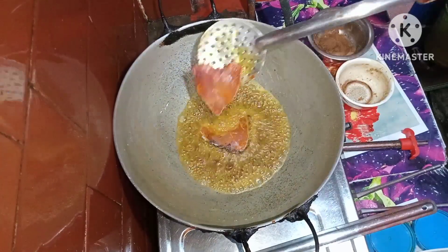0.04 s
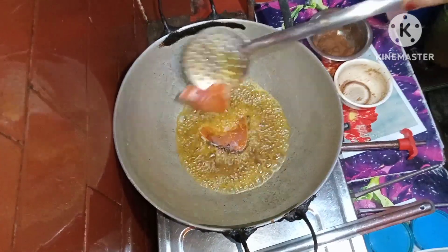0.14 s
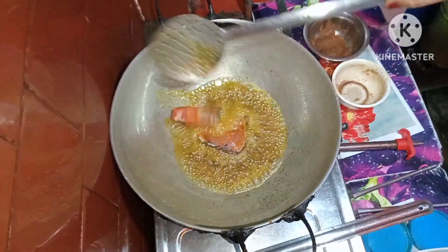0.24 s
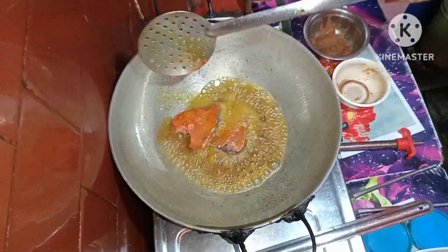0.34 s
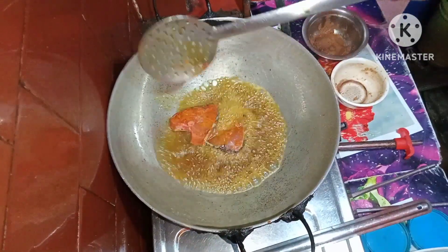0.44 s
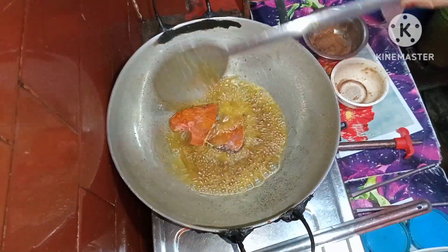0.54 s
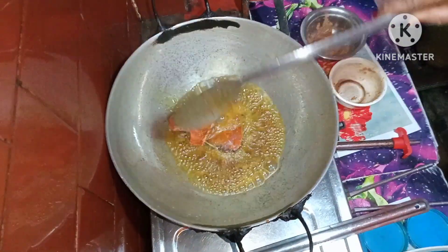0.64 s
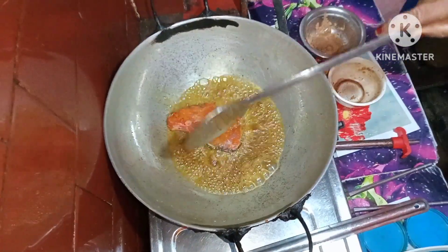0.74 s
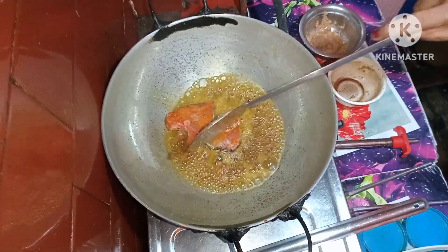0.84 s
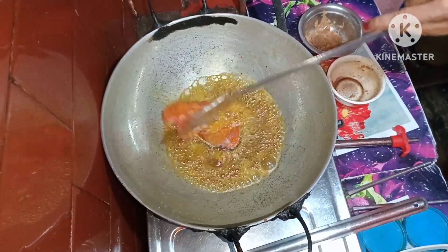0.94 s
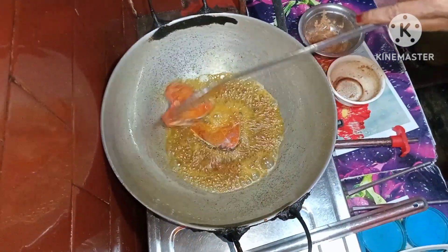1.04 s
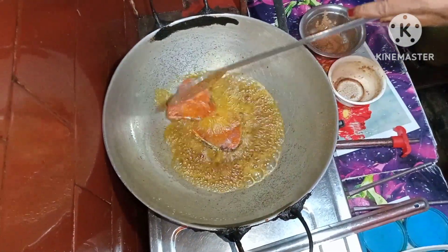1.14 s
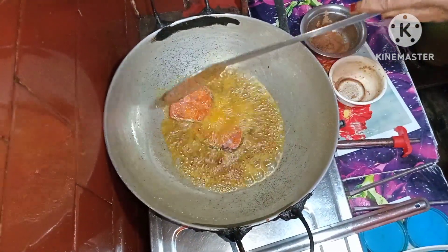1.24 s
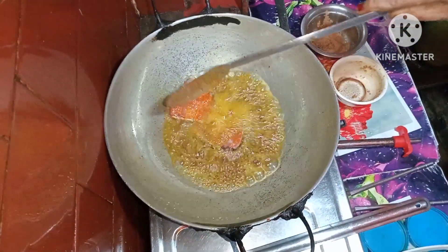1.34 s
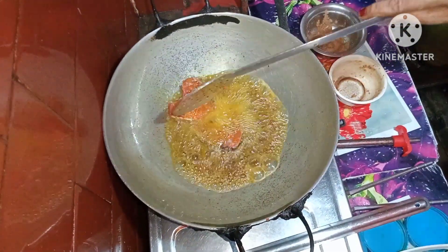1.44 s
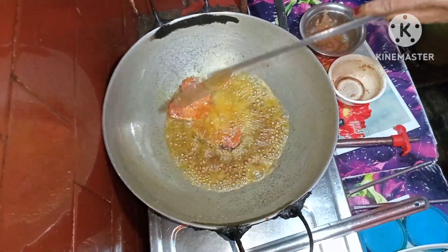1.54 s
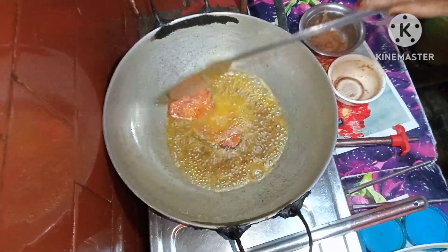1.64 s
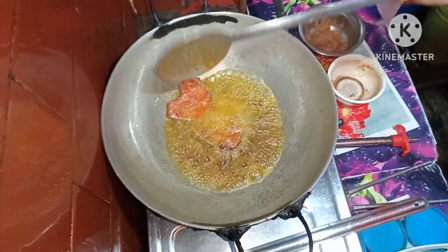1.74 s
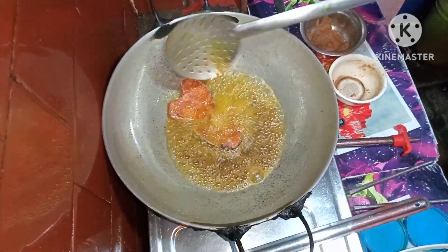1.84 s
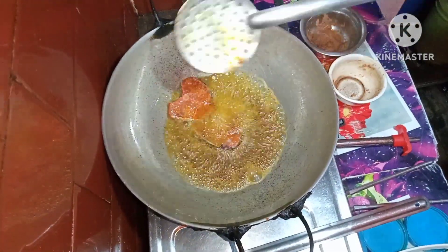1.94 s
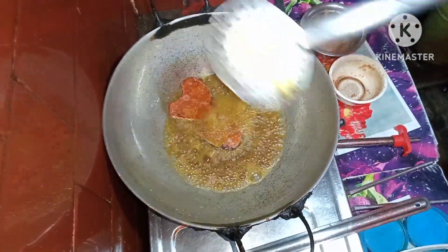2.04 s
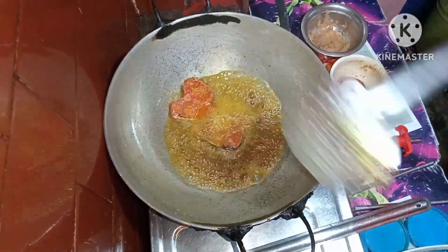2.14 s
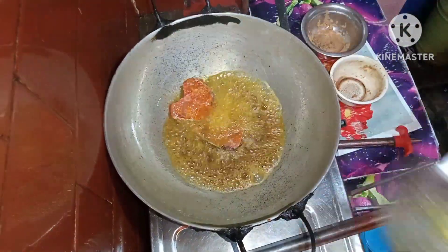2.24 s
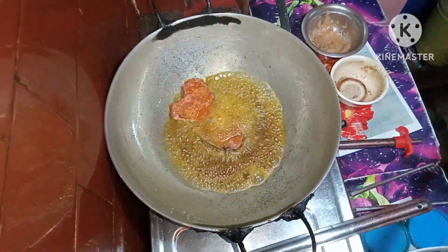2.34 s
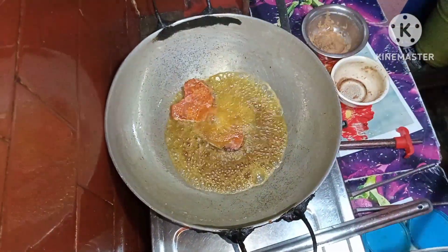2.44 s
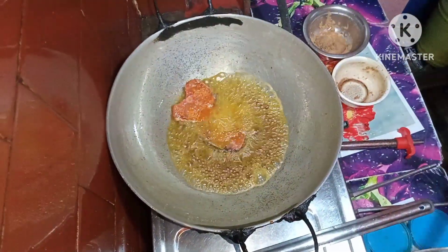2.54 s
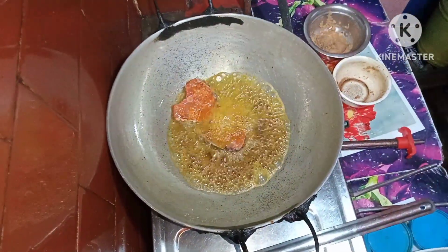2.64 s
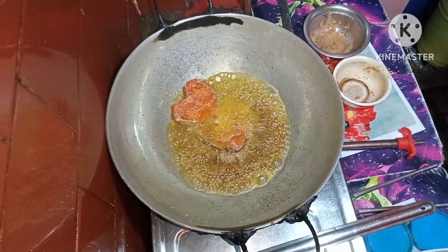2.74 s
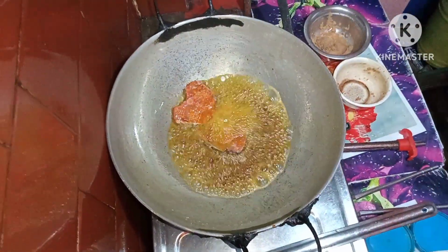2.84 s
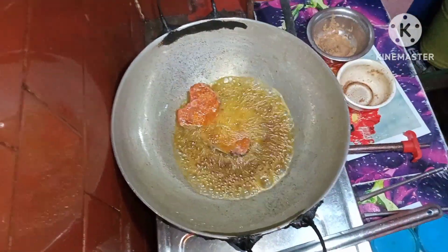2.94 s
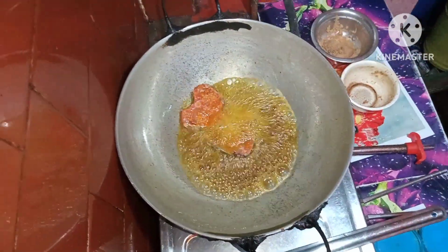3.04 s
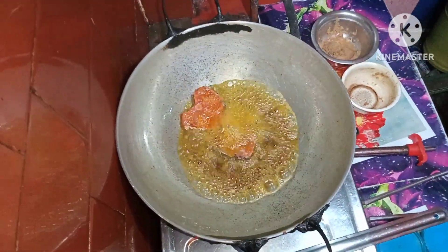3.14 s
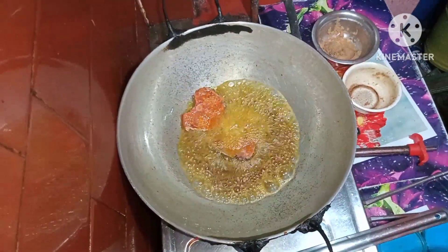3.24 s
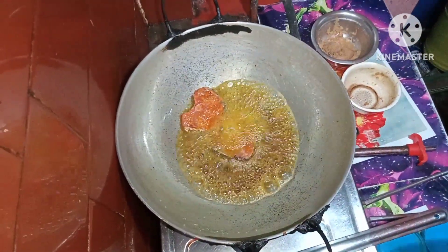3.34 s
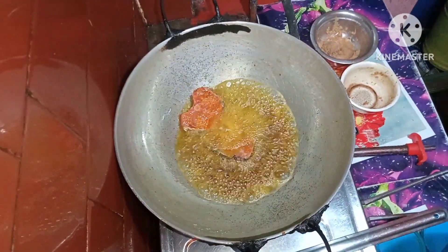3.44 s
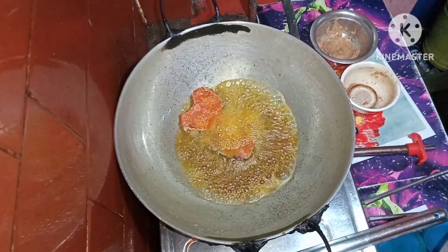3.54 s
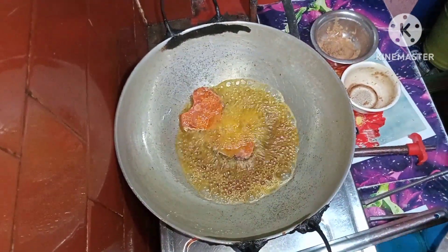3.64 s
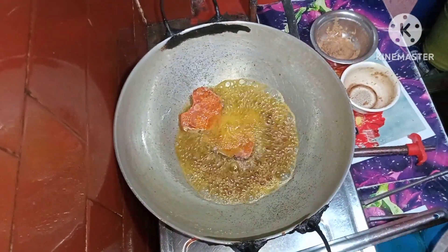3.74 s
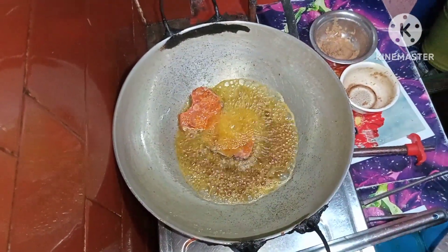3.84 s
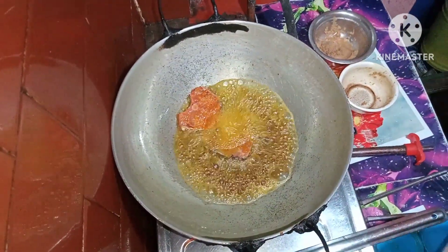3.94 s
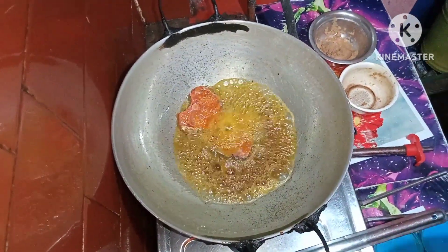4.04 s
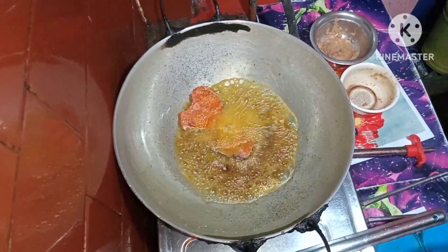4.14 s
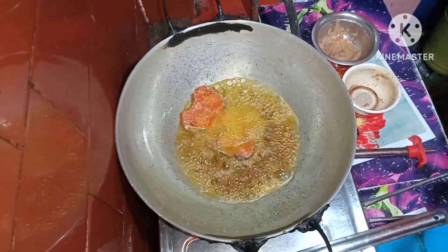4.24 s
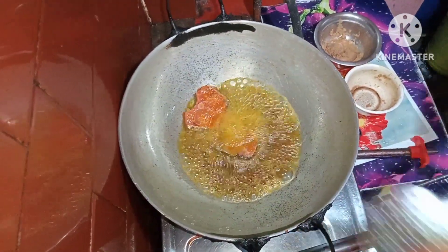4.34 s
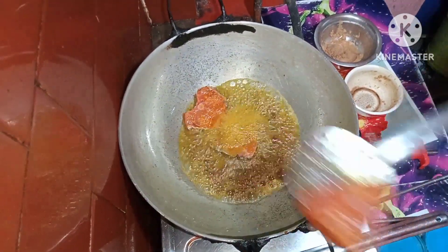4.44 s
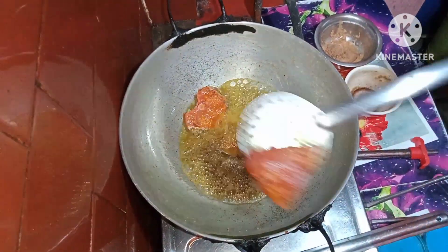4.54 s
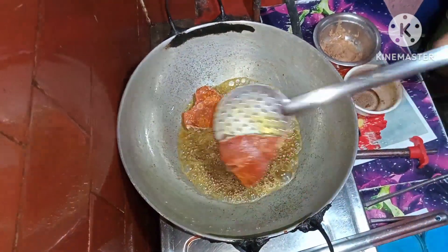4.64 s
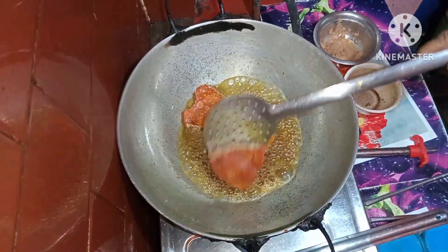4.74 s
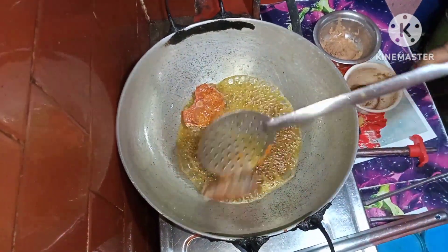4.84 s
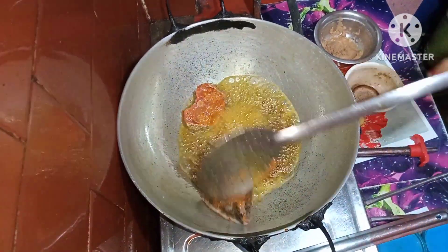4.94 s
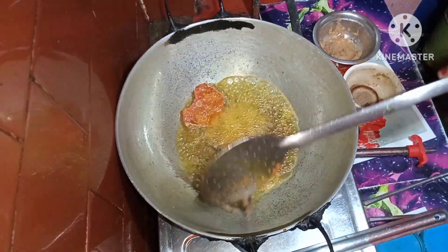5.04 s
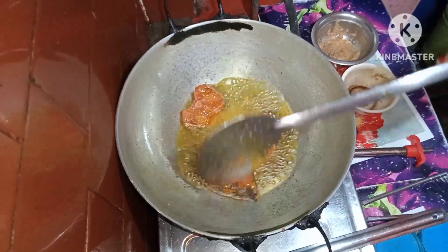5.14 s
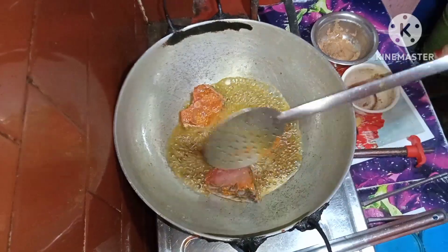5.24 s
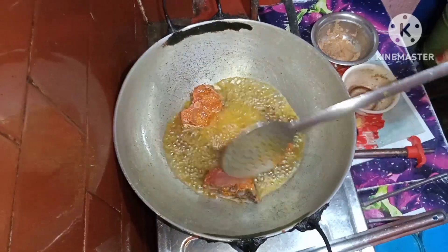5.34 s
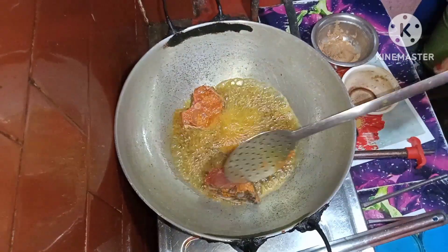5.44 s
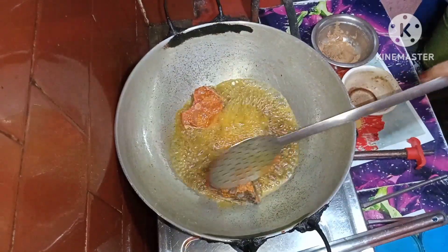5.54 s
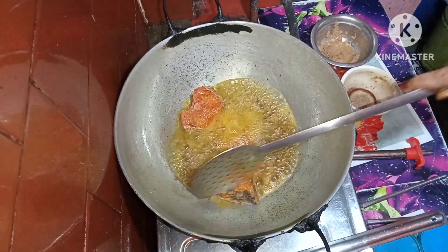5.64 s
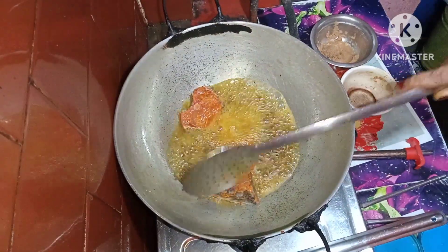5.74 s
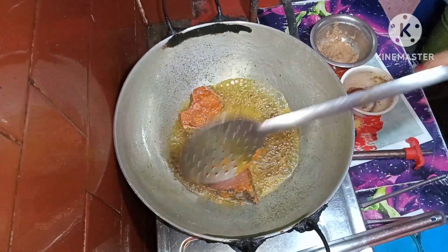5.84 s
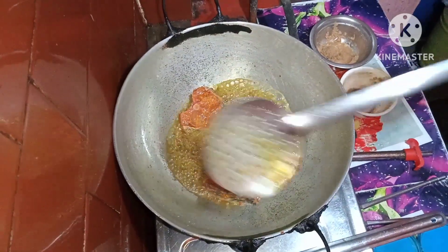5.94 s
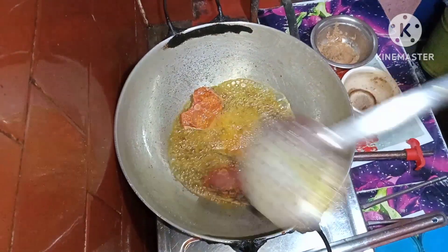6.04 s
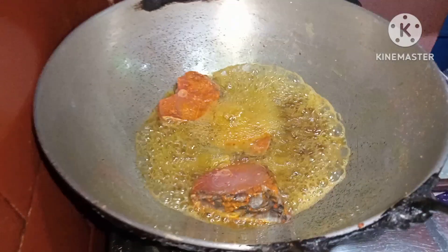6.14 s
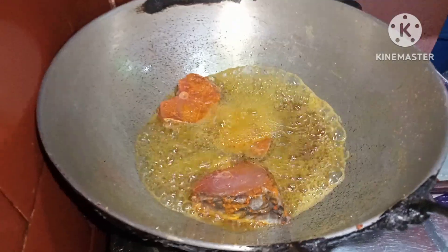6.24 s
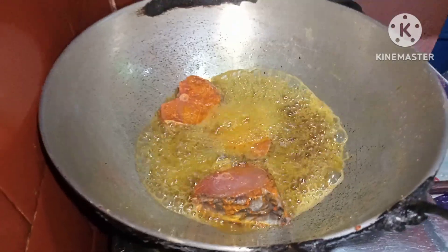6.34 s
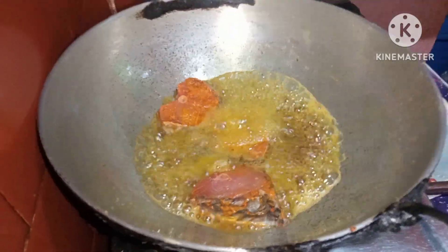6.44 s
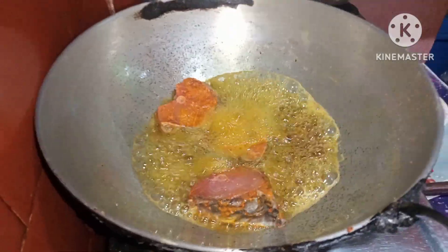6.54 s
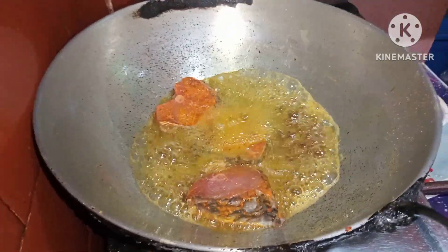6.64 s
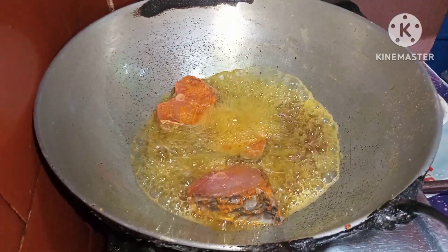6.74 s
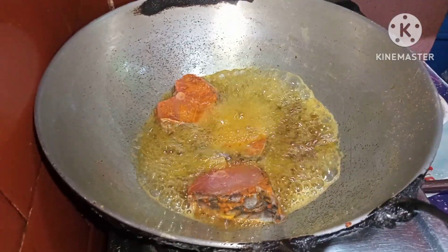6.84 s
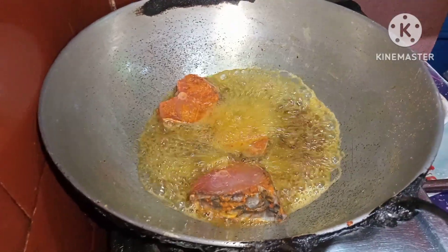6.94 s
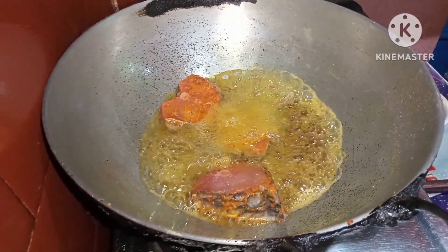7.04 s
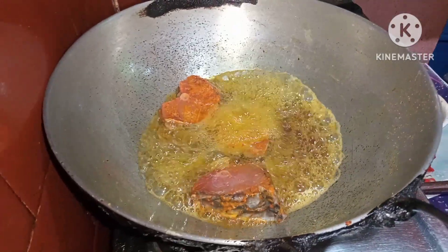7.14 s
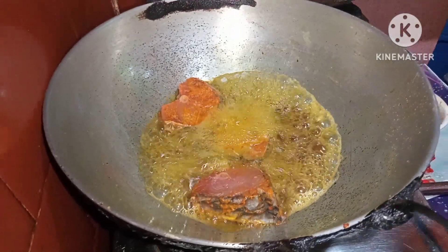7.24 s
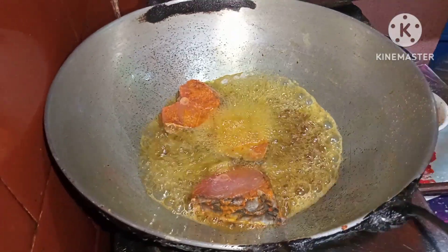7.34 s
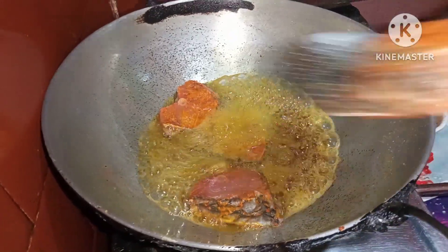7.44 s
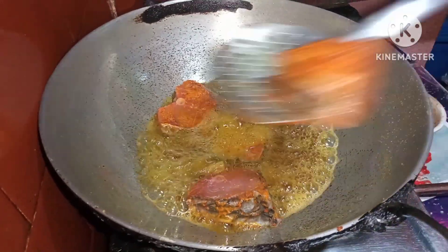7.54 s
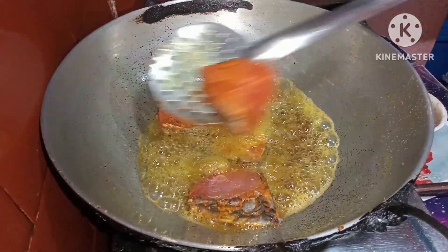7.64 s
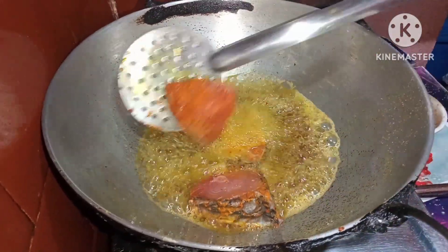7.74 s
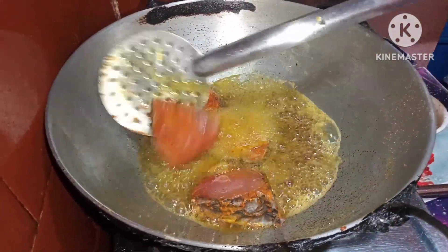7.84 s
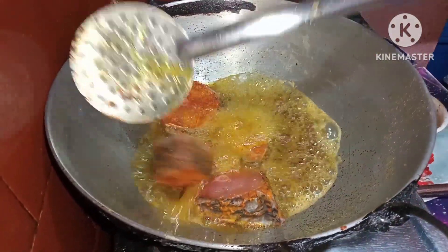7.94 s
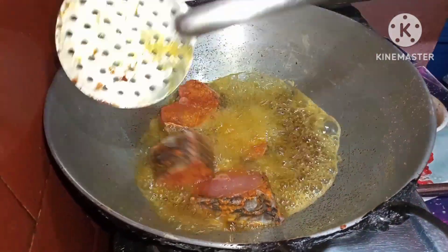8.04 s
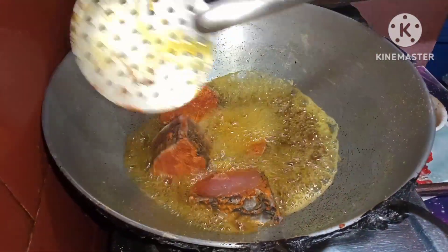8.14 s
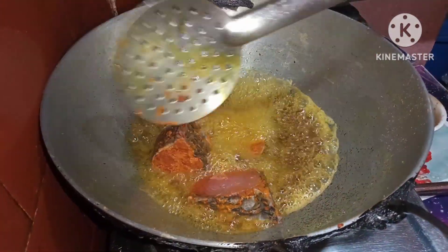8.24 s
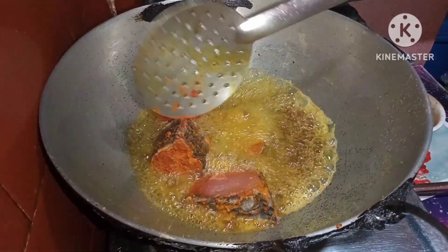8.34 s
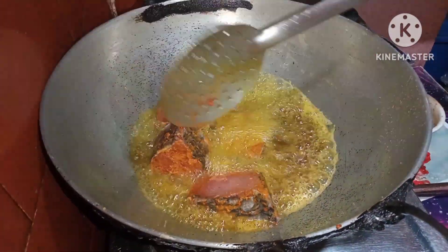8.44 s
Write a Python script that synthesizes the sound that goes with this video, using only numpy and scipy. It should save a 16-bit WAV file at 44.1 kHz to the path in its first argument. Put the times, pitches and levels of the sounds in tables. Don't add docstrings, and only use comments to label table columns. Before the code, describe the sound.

Pieces of fish fry in hot oil in a steel wok in a small kitchen, the microphone close above. A dense, bright sizzle runs throughout, made of countless tiny bubbles, with irregular single pops and sharper small snaps echoing briefly in the bowl. It surges around 0.3 s, and the pops are busy and loud from 0.9 to 1.4 s. Dishes knock down in a dull, short-ringing cluster at 2.5-2.9 s; one rubs along the table at 3.3-3.8 s, loudest near 3.6. The frying eases, then flares wetly at about 5.1-5.6 s. At 6 s the microphone moves nearer, and the fine spit softens. A hard metallic ladle click with a rapid bounce strikes at 6.7 s. Faint dish taps come at 7.7-8.1 s, with a small sizzle swell near 8 s. Low room noise, faint singing steel and a quiet pulsing motor hum stay underneath.

```python
import sys
import numpy as np
from scipy import signal
from scipy.fft import rfft, irfft
from scipy.io import wavfile
from scipy.ndimage import uniform_filter1d

SR = 44100
rng = np.random.default_rng(int(sys.argv[2]) if len(sys.argv) > 2 else 0)


def wav_record(signal):
    frames = np.transpose(np.atleast_2d(signal))
    bounded = np.clip(frames, -1, 1)
    quanta = np.round(bounded * 32767).astype(np.int16)
    wavfile.write(sys.argv[1], SR, quanta)


def level_to_linear(level):
    exponent = np.asarray(level, float) / 20
    return 10 ** exponent


N = 374409


def evened(x):
    return x / np.sqrt(np.mean(abs(x) ** 2) + 1e-20)


def read(points, hz):
    point_hz, value = np.transpose(points)
    return np.interp(np.log(hz + 1), np.log(point_hz + 1), value)


def add(mix, start_s, sound):
    part = mix[max(round(start_s * SR), 0):][:len(sound)]
    part += sound[:len(part)]


def resonance(hz, centre_hz, width_hz):
    return 1 / (1 + (2 * (hz - centre_hz) / width_hz) ** 2)


# lull_s, level_db (of the swell that follows)
HUM_BEATS = [(-.5, -65), (.09, -60), (.75, -65), (1.39, -61), (1.92, -61), (2.55, -61.5), (3.28, -60),
             (3.99, -61), (4.61, -58.5), (5.2, -60), (5.93, -58.5), (6.72, -59.5), (7.26, -58), (7.76, -58),
             (8.3, -60), (8.9, -60)]
HUM_HZ, LULL_DB = 98.3, -14.5


def hum():
    t = np.arange(N) / SR
    lull_s, level_db = np.transpose(HUM_BEATS)
    count = np.arange(len(lull_s))
    beat = np.interp(t, lull_s, count)
    lull = level_to_linear(LULL_DB)
    swell = lull + (1 - lull) * abs(np.sin(np.pi * beat))
    level = np.sqrt(2) * level_to_linear(np.interp(beat, count + .5, level_db))
    return level * swell * np.sin(2 * np.pi * HUM_HZ * t)


# pitch_hz, width_hz, level_db
SINGING_STEEL = [(560, 53, -72), (879, 55, -48.5)]
# frequency_hz, density_db (per Hz)
ROOM_COLOUR = [(12, -51), (20, -21), (43, -18), (92, -5), (147, -7), (203, -8.5), (398, 0), (500, -10),
               (650, -38), (1100, -120)]
ROOM_DB = -61


def kitchen():
    hz = np.fft.rfftfreq(N, 1 / SR)
    noise = rfft(rng.standard_normal(N))
    room = irfft(noise * level_to_linear(read(ROOM_COLOUR, hz)) * (hz < 600), N)
    out = level_to_linear(ROOM_DB) * evened(room)
    for pitch_hz, width_hz, level_db in SINGING_STEEL:
        out += level_to_linear(level_db) * evened(irfft(noise * resonance(hz, pitch_hz, width_hz), N))
    return out + hum()


# time_s, table_db, dish_db
SLIDE = [
    (3.3, -71, -38),
    (3.448, -56, -58),
    (3.548, -59, -44),
    (3.64, -45, -34),
    (3.8, -66, -57),
]


def drag(table_hz=258, table_width_hz=35, dish_hz=(750, 1040), dish_width_hz=130):
    time_s, table_db, dish_db = np.transpose(SLIDE)
    t = np.arange(time_s[0], time_s[-1], 1 / SR)
    hz = np.fft.rfftfreq(len(t), 1 / SR)
    rub = rfft(rng.standard_normal(len(t)))
    table = irfft(rub * resonance(hz, table_hz, table_width_hz), len(t))
    dish = irfft(sum(rub * resonance(hz, f, dish_width_hz) for f in dish_hz), len(t))
    sound = level_to_linear(np.interp(t, time_s, table_db)) * evened(table)
    sound += level_to_linear(np.interp(t, time_s, dish_db)) * evened(dish)
    out = np.zeros(N)
    add(out, time_s[0], sound * signal.windows.tukey(len(t), .2))
    return out


def struck(modes, chance, spread=0.093, rise_s=0.0034):
    t = np.arange(9000) / SR
    ring = np.zeros(len(t))
    for (hz, level_db, t60_s), (off, phase) in zip(modes * 3, chance):
        partial_hz = hz * (1 + spread * (2 * off - 1))
        ring += level_to_linear(level_db - 60 * t / t60_s) * np.sin(2 * np.pi * (partial_hz * t + phase))
    ring *= np.minimum(t / rise_s, 1)
    return ring / abs(ring).max()


# start_s, peak_db, strongest_hz, strongest_t60_s, table_db (re strongest ring)
DISH_KNOCKS = [(2.48, -19.5, 727, 0.067, -2), (2.497, -27, 1020, 0.08, -5),
               (2.609, -14.5, 908, 0.044, -15.5), (2.643, -23, 914, 0.08, -4),
               (2.796, -24.5, 764, 0.13, -8), (2.858, -31, 760, 0.1, -10), (2.883, -21.5, 760, 0.12, -1),
               (3.576, -22.5, 1100, 0.08, -10), (3.841, -30, 1050, 0.1, -14), (7.659, -29.5, 915, 0.071, 2),
               (7.859, -31, 902, 0.13, -17), (8.119, -44, 614, 0.097, -8)]
# pitch_hz, level_db, t60_s
TABLE_MODES = [(248, -5.5, 0.12), (413, -4.5, 0.094), (747, -4, 0.12), (867, 5.5, 0.027), (1117, 2, 0.033),
               (1748, 1, 0.091)]
# start_s, peak_db
LADLE_CLICKS = [
    (6.6817, -13),
    (6.6843, -6.5),
    (6.6868, -10),
    (6.699, -27),
]
# pitch_hz, level_db, t60_s
LADLE_MODES = [(152, -25, 0.023), (290, -8, 0.043), (456, -2, 0.019), (555, 8, 0.024), (930, -6, 0.033),
               (1240, -1.5, 0.04), (1710, -12, 0.027), (2180, -5, 0.057), (2540, 0, 0.037),
               (3200, -6, 0.045), (3600, -14, .025)]
THIN_HZ = 169


def knocks():
    out = np.zeros(N)
    chance = rng.random((len(DISH_KNOCKS) + len(LADLE_CLICKS), 3 * len(LADLE_MODES), 2))
    for (start_s, peak_db, hz, t60_s, table_db), c in zip(DISH_KNOCKS, chance):
        modes = [(f, level_db + table_db, ring_s) for f, level_db, ring_s in TABLE_MODES]
        modes.append((hz, 0, t60_s))
        add(out, start_s, level_to_linear(peak_db) * struck(modes, c))
    for (start_s, peak_db), c in zip(LADLE_CLICKS, chance[::-1]):
        add(out, start_s, level_to_linear(peak_db) * struck(LADLE_MODES, c, spread=0.061, rise_s=0.00048))
    return signal.sosfilt(signal.butter(2, THIN_HZ, "high", fs=SR, output="sos"), out)


# delay_s, level_db
BOWL_ECHOES = [
    (.0028, -9),
    (.0058, -13.5),
    (.0095, -17),
    (0.0131, -19),
]


def one_place(x, stretch, wet_db=-6, t60_s=0.14, start_s=0.002):
    taps = np.zeros(SR // 3)
    at = np.arange(0, len(taps) - 20, 20)
    at = at + rng.integers(0, 20, len(at))
    delay_s = at / SR
    taps[at] = rng.choice([-1., 1.], len(at)) * level_to_linear(-60 * delay_s / t60_s) * np.clip(delay_s / start_s, 0, 1)
    taps *= level_to_linear(wet_db) / np.linalg.norm(taps)
    taps[0] = 1
    for echo_s, level_db in BOWL_ECHOES:
        taps[round(echo_s * stretch * SR)] += level_to_linear(level_db)
    return signal.oaconvolve(x, taps)[:N]


def wok_and_walls(x, turns_per_s=2.3):
    turn = 2 * np.pi * turns_per_s * np.arange(N) / SR
    shares = [np.maximum(np.cos(turn + 2 * np.pi * k / 3), 0) ** 2 + 1e-3 for k in range(3)]
    total = sum(shares)
    return sum(one_place(x * share / total, stretch) for share, stretch in zip(shares, (.9, 1., 1.12)))


def bubble(hz, t60_s, rise_cycles=1.48, glide=0.041):
    t = np.arange(2200) / SR
    shape = (1 - np.exp(-(t * hz / rise_cycles) ** 2)) * level_to_linear(-60 * t / t60_s)
    sound = shape * np.sin(2 * np.pi * hz * t * (1 + glide * np.minimum(t / t60_s, 1)))
    return sound / abs(sound).max()


# frequency_hz, level_db
MICROPHONE_TOP = [(4120, -32), (7000, -4), (7720, -8), (9850, -8.5), (10700, -7), (11500, -0.5),
                  (13200, -2), (13750, -1), (14200, -7), (15700, -13.5)]


def with_top(body, hz, joint_hz=7300):
    top = read(MICROPHONE_TOP, hz) + read(body, joint_hz) - read(MICROPHONE_TOP, joint_hz)
    return np.where(hz < joint_hz, read(body, hz), top)


# start_s, # peak_db, pitch_hz, crack_db (re peak)
LARGE_POPS = [(0.0655, -11.5, 2480, -3.5), (0.157, -12, 2720, -3), (0.273, -6.5, 2830, -12),
              (0.8053, -17, 3250, -3), (0.821, -16, 2260, 0), (1.0112, -13, 3620, -4),
              (1.0965, -9, 1650, -1.5), (1.1196, -11, 2780, -7), (1.2686, -5, 2070, -5),
              (1.3428, -2, 2520, -20), (1.924, -7, 2560, -19), (2.268, -16, 1520, -2),
              (2.4076, -6, 2490, -25), (2.525, -10.5, 2540, -12), (3.1763, -13, 2230, -18),
              (3.6068, -11.5, 2640, -3.5), (3.955, -8, 1990, -16), (4.2146, -7.5, 3020, -25),
              (4.338, -17.5, 2950, -7), (4.5085, -14, 3030, -6), (4.6673, -15.5, 3420, -10),
              (4.768, -22, 2130, 2), (5.0, -22.5, 3100, 7), (5.651, -6, 2580, -10), (6.6837, -9, 1814, -14),
              (6.8423, -15, 3400, -9), (7.044, -8.5, 2060, -6), (7.617, -11, 2960, -6),
              (7.8677, -12, 3030, -10), (8.404, -10.5, 3030, -13)]
# start_s, peak_db, pitch_hz
SMALL_SNAPS = [(0.0635, -6.5, 5300), (0.693, -11, 6040), (0.785, -11.5, 5300), (0.9336, -10.5, 5740),
               (0.9502, -10, 6040), (1.0043, -6.5, 5500), (1.0925, -9, 5200), (1.2006, -8, 5100),
               (1.253, -8, 5740), (1.3529, -7.5, 5700), (1.724, -14, 6170), (1.829, -11, 5860),
               (2.818, -9.5, 5600), (3.045, -13, 5940), (3.2597, -10.5, 5130), (3.5825, -12, 6210),
               (3.761, -11.5, 5900), (4.107, -15, 5800), (4.2217, -8, 6100), (4.3724, -15, 5800),
               (4.39, -12.5, 5960), (5.171, -7, 6040), (5.4938, -9.5, 5950), (6.2656, -7.5, 5240),
               (6.319, -12, 5670), (6.373, -13, 5440), (6.9366, -12, 4940), (7.198, -14, 4900),
               (7.3921, -12.5, 5560), (8.1836, -11, 5600)]
# start_s, peak_db
MIDDLING_PLOPS = [(0.036, -27), (0.052, -16), (0.3577, -15), (0.479, -15.5), (0.659, -16), (0.968, -17),
                  (0.992, -15), (1.493, -9.5), (1.5326, -14), (1.621, -13), (1.7413, -14.5), (1.7846, -17),
                  (1.9643, -10.5), (2.0957, -10), (2.2994, -14.5), (2.789, -13), (2.9738, -16),
                  (3.552, -15.5), (3.6535, -16), (4.4167, -16), (4.593, -21), (5.1047, -16), (5.125, -17.5),
                  (5.171, -24), (5.236, -18), (6.293, -14), (7.7676, -14.5), (7.791, -14), (8.055, -16),
                  (8.163, -21)]
BOWL_HZ, LATER_BOWL_HZ, HIGHER_NOTE_S = 2620, 3180, 4.6
POP_T60_S, SNAP_T60_S, PLOP_CRACK_DB, PLOP_SPREAD = 0.01, 0.0061, -10.5, 0.032


def pops(crack_t60_s=0.036, rise_s=0.00071, low_hz=1800, high_hz=3700, top_db=-16):
    rings, cracks = np.zeros(N), np.zeros(N)
    t = np.arange(1500) / SR
    events = list(LARGE_POPS)
    detune = 1 + PLOP_SPREAD * rng.standard_normal(len(MIDDLING_PLOPS))
    for (start_s, peak_db), off in zip(MIDDLING_PLOPS, detune):
        bowl_hz = BOWL_HZ if start_s < HIGHER_NOTE_S else LATER_BOWL_HZ
        events.append((start_s, peak_db, off * bowl_hz, PLOP_CRACK_DB))
    tear_shape = level_to_linear(-60 * t / crack_t60_s) * (1 - np.exp(-t / rise_s))
    tearing = rng.standard_normal((len(events), len(t))) * tear_shape
    for (start_s, peak_db, pitch_hz, crack_db), tear in zip(events, tearing):
        add(rings, start_s, level_to_linear(peak_db) * bubble(pitch_hz, POP_T60_S, rise_cycles=1.7))
        add(cracks, start_s, level_to_linear(peak_db + crack_db) * tear)
    for start_s, peak_db, pitch_hz in SMALL_SNAPS:
        add(rings, start_s, level_to_linear(peak_db) * bubble(pitch_hz, SNAP_T60_S, rise_cycles=0.66))
    hz = np.fft.rfftfreq(N, 1 / SR)
    band = 1 / (1 + (low_hz / (hz + 1)) ** 6) / (1 + (hz / high_hz) ** 6)
    colour = band + level_to_linear(top_db + with_top(FAR_COLOUR, hz)) * (hz > high_hz)
    return rings + irfft(rfft(cracks) * evened(colour), N)


def bursts(per_s=9000, spread_db=4.0, cycles=4.2, clump_db=2.5, clump_s=.016):
    pitches = np.geomspace(400, 15500, num=36)
    clumps = evened(uniform_filter1d(rng.standard_normal(N), round(clump_s * SR)))
    out = np.zeros(N)
    for hz in pitches:
        chance, size = rng.random(N), rng.exponential(1, N)
        rate = per_s * np.sqrt(hz) / np.sqrt(pitches).sum() * level_to_linear(clump_db * clumps)
        train = (chance < rate / SR) * level_to_linear(spread_db * np.minimum(size, 4))
        one_burst = bubble(hz, 3 * cycles / hz)[:1500]
        ringing = signal.oaconvolve(train - train.mean(), one_burst)[:N]
        out += evened(ringing) * np.sqrt(hz)
    return out


# time_s, vigour_db, wetness_db (extra fine spit), coarseness_db (extra large bubbles)
OIL_STATE = [(0.0, -28.5, -7, -3), (0.24, -27.5, -9, 0.5), (0.33, -24.5, -3.5, -3), (0.5, -27, -3, 2.5),
             (0.97, -25.5, -8.5, -2), (1.16, -25, -3.5, -1.5), (1.5, -26, -3.5, -1), (2.4, -27.5, -9.5, -5),
             (2.7, -28, -7.5, 0), (3.2, -29, -7.5, -2.5), (4.8, -30, -8, -3.5), (5.1, -25.5, -4, -4.5),
             (5.44, -26.5, -5, -4.5), (5.72, -28, -5.5, -4), (6.15, -30, -12.5, -4.5),
             (7.85, -32.5, -12, -2), (7.96, -27, -12.5, -3.5), (8.49, -32, -10, 2)]
# centre_s, strength_db, length_s
STEAM_FLASHES = [(0.0, 0, 0.047), (0.07, 2, .03), (1.08, 7.5, 0.088), (1.886, -1, 0.018), (2.68, 2.5, .02),
                 (3.168, 5, 0.029), (3.904, 13, .008), (4.342, 5.5, .02), (4.947, 5, 0.017),
                 (5.192, 8, 0.14), (5.68, 3.5, 0.09), (6.3, 1, .06), (7.162, 4, .06), (8.18, 5, .05)]
FLASH_REACH = (.05, 0.47, 0.27, 1.3)
SIMMER_DB, SIMMER_FOLLOWS, STEADY_DB = -40, .45, -31.5


def working(t):
    time_s, *controls = np.transpose(OIL_STATE)
    vigour, wet, coarse = (np.interp(t, time_s, c) for c in controls)
    flash = sum(db * np.exp(-(2 * (t - at) / length) ** 2) for at, db, length in STEAM_FLASHES)
    boil = vigour + coarse
    simmer = SIMMER_DB + SIMMER_FOLLOWS * (boil - STEADY_DB)
    return np.array([simmer, boil, vigour, vigour + wet]) + np.outer(FLASH_REACH, flash)


# centre_s, strength_db, length_s, pitch_hz
FROTH = [(0.17, 14, .04, 3000), (0.287, 5, .04, 2900), (1.51, 0, .04, 2700), (4.52, 4, .04, 2900),
         (4.6, 9, .03, 2400), (5.18, 8, 0.12, 3100), (5.213, 8, 0.076, 5160), (5.336, 1.5, .12, 5550),
         (5.554, 9.5, 0.26, 1680), (6.72, 17, 0.073, 1250), (6.732, 15, 0.072, 600),
         (6.938, 5, 0.022, 4870), (7.065, 17, .05, 2400), (7.144, 10, 0.053, 5200), (7.88, 9, 0.032, 3820),
         (8.2, 5.5, 0.72, 3100)]
FROTH_OCTAVES = 0.34


def seething(hz, t):
    lift = 0
    for centre_s, strength_db, length_s, pitch_hz in FROTH:
        in_pitch = np.exp(-(2 * np.log2((hz + 1) / pitch_hz) / FROTH_OCTAVES) ** 2)
        in_time = np.exp(-(2 * (t - centre_s) / length_s) ** 2)
        lift = lift + strength_db * np.outer(in_pitch, in_time)
    return lift


# low_hz, high_hz
BUBBLE_BANDS = [
    (400, 1400),
    (1500, 4200),
    (4400, 7500),
    (8000, 15500),
]
# frequency_hz, density_db (per Hz)
FAR_COLOUR = [(240, -39.5), (400, -18), (525, -28), (705, -12.5), (768, -18.5), (891, -13), (971, -19.5),
              (1070, -6), (1460, -11.5), (1980, -7.5), (2360, -4.5), (2540, -2.5), (3500, -6.5),
              (4300, -14), (4900, -6.5), (6090, 0), (7600, -14.5)]
# frequency_hz, density_db (per Hz)
NEAR_COLOUR = [(240, -60), (400, -16), (538, -11.5), (593, -15), (723, -10), (869, -9.5), (1030, -12.5),
               (1310, -8.5), (1730, -6.5), (1840, -4.5), (2480, -4.5), (3020, -1), (3600, -5), (4310, -11),
               (5190, -4), (6300, -11.5), (7600, -21)]
COLOUR_CHANGE_S = 6.02


def sizzle(hiss_share=0.51, patchy_db=1.57):
    hz, t, z = signal.stft(wok_and_walls(bursts()), SR, nperseg=512, noverlap=384)
    z = z / np.sqrt((abs(z) ** 2).mean(1))[:, None]
    a, b, patches = rng.standard_normal((len(t), len(hz), 3)).T
    z = np.sqrt(1 - hiss_share) * z + np.sqrt(hiss_share / 2) * (a + 1j * b)
    patches = uniform_filter1d(patches, size=6, axis=0)
    patches = evened(uniform_filter1d(patches, size=20, axis=1))
    near = np.clip((t - COLOUR_CHANGE_S) / 0.3 + .5, 0, 1)
    colour_db = np.outer(with_top(FAR_COLOUR, hz), 1 - near) + np.outer(with_top(NEAR_COLOUR, hz), near)
    lifts = []
    for level_db, (low_hz, high_hz) in zip(working(t), BUBBLE_BANDS):
        band = colour_db[(hz >= low_hz) & (hz < high_hz)]
        lifts.append(level_db - 10 * np.log10((level_to_linear(band) ** 2).sum(0)))
    centres = np.log(np.sqrt(np.prod(BUBBLE_BANDS, axis=1)))
    blend = np.array([np.interp(np.log(hz + 1), centres, row) for row in np.eye(len(BUBBLE_BANDS))])
    z = z * level_to_linear(colour_db + blend.T @ np.array(lifts) + seething(hz, t) + patchy_db * patches)
    return signal.istft(z, SR, nperseg=512, noverlap=384)[1][:N]


def scene():
    return (sizzle() + wok_and_walls(pops() + knocks()) + drag() + kitchen())[None]


def low_pass(x):
    return signal.sosfilt(signal.butter(12, 15950, fs=SR, output="sos"), x)


CEILING, EDGE_HZ = .62, 15500


def record(dry):
    dry = dry / (1 + (abs(dry) / CEILING) ** 4) ** (1 / 4)
    lowpass = signal.firwin(1023, EDGE_HZ, window=("kaiser", 5), fs=SR)
    limited = signal.oaconvolve(dry, lowpass[None], "same")
    return low_pass(limited)


dry = scene()
out = record(dry)
wav_record(out)
```